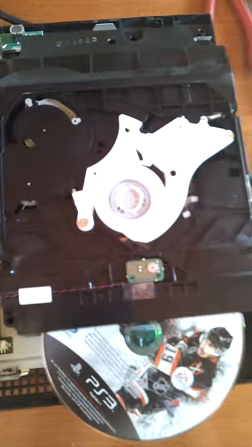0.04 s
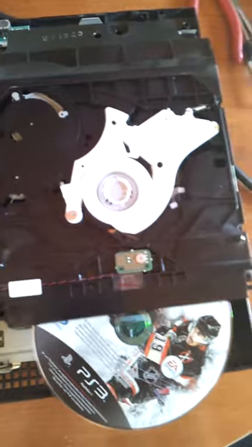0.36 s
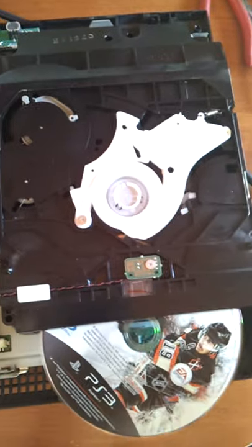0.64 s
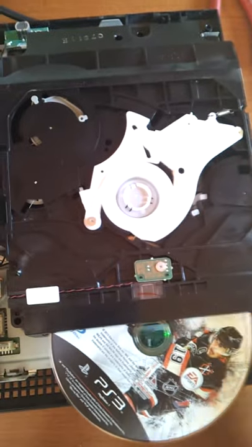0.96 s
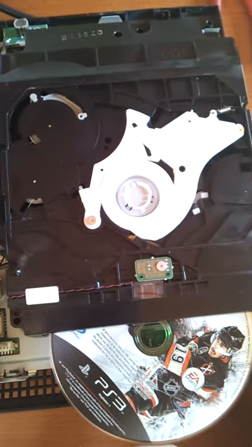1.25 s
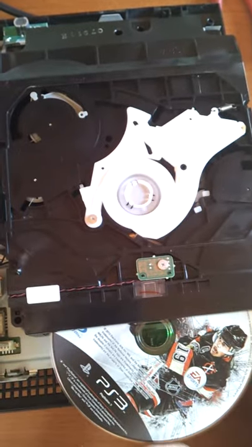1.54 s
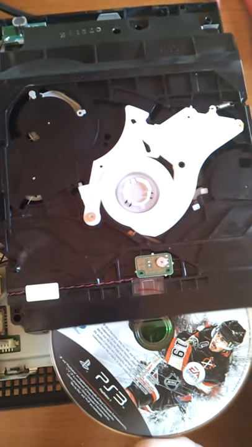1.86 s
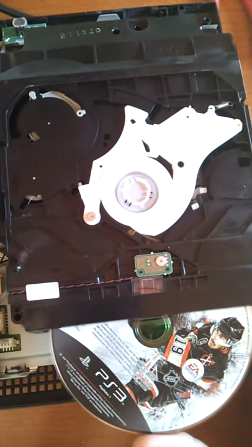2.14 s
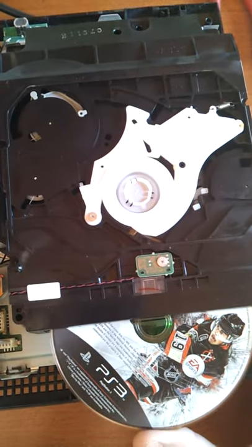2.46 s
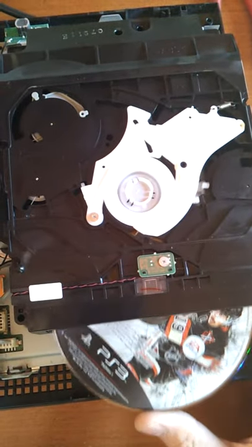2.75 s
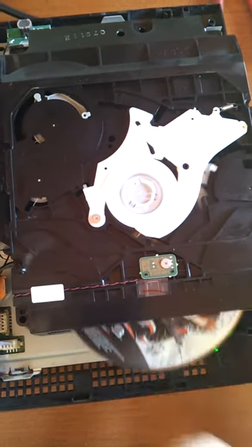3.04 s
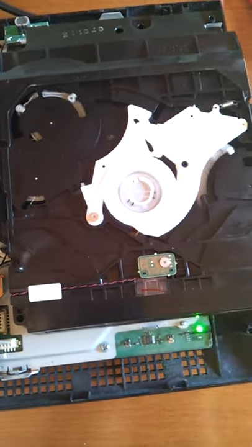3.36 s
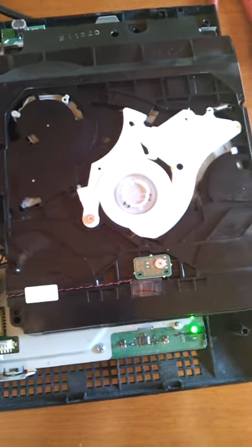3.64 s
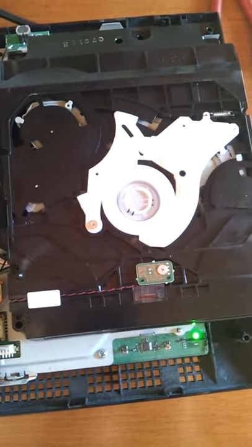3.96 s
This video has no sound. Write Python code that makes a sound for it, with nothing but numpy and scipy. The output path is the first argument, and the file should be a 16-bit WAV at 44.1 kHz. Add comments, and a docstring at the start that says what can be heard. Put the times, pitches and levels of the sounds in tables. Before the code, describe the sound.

A disc drive loads a disc, close up in a small room. A few light knocks come at 0.1 seconds, then faint hiss and a fading low hum, with soft bumps around 2.5. At 2.65 the rollers grab the disc with a loud, brief plastic rattle and tiny squeaks. The motor and gears whir until the end at 4 seconds, with sharp lever clicks and a latch snapping near 3.65.

```python
"""The loading motor of an open slot-loading disc drive pulls in a disc, close up on a table.
First come a few knocks, a low hum running down in room hiss and soft bumps as a hand nudges the disc.
At 2.65 s the rollers grab it with a harsh plastic rattle and tiny squeaks. The gears then whir and
tick with each turn of the shaft, while levers knock, the chassis rings and a spring latch snaps over."""
import sys
import numpy as np
from scipy import signal
from scipy.fft import rfft, irfft
from scipy.io import wavfile

SR = 44100
rng = np.random.default_rng(int(sys.argv[2]) if len(sys.argv) > 2 else 0)


def wav_record(signal):
    """Record a signal, one row per channel, as 16-bit PCM in the file named by sys.argv[1]."""
    frames = np.transpose(np.atleast_2d(signal))
    bounded = np.clip(frames, -1, 1)
    # unit amplitude maps onto the largest positive 16-bit level
    quanta = np.round(bounded * 32767).astype(np.int16)
    wavfile.write(sys.argv[1], SR, quanta)


N = 176400
T = np.arange(N) / SR
HZ = np.fft.rfftfreq(N, 1 / SR)
BURST_HZ = np.fft.rfftfreq(4096, 1 / SR)

# stereo image of the drive, narrowest in the mids: f/Hz, left-right correlation
DRIVE_LIKENESS = [(180, 0.35), (550, 0.81), (1100, 0.73), (2000, 0.05), (4970, 0.02)]


def motor(wobble=.005, flutter=.26, pulsing=.28):
    """Motor and gears whir: shaft harmonics, a buzz that repeats each turn, pulsing grit, ringing teeth."""
    # shaft speed: t/s, f/Hz
    shaft_speed = [(2.7, 81.6), (2.82, 86), (2.96, 82), (3.07, 92), (3.2, 86.8), (3.5, 90), (3.62, 87),
                   (3.74, 90), (3.88, 85), (4, 85.4)]
    # gear train envelope: t/s, body level/dB, treble level/dB
    whir = [(2.64, -86, -90), (2.67, -42.5, -31.5), (2.83, -44.5, -42), (3.08, -45.5, -42),
            (3.36, -45, -41.5), (3.52, -43.5, -40.5), (3.6, -39.5, -38), (3.71, -42.5, -40),
            (3.85, -40, -39.5), (4, -40, -38)]
    # shaft harmonics: multiple of the shaft speed, level/dB
    orders = [(5, -2.5), (6, 1), (7, -2.5), (8, 3), (9, -1), (10, .5), (24, -2), (26, -13), (30, -1)]
    # gear noise spectrum: f/Hz, level/dB
    gear_colour = [(88, -22), (150, -19), (361, -17.5), (480, -6), (566, -8.5), (854, 2), (1060, -7),
                   (1290, -2), (1600, -5), (2200, -2.5), (3920, -11), (4860, -8.5), (5500, -9),
                   (6400, -8.5), (8900, -22), (14500, -19.5), (16000, -34)]
    # gear panning: f/Hz, left over right/dB
    gear_balance = [(110, 9), (380, 7), (700, -11.5), (1290, 6), (2380, 2), (4400, 1.5), (8120, 7),
                    (15000, 5)]
    # the gears brighten as the disc goes in: t/s, top octave level/dB
    sheen = [(3.3, -3.5), (3.87, 1.5)]
    speed = curve(shaft_speed) * (1 + wobble * drift(19.66))
    turns = np.cumsum(speed) / SR
    angle = 2 * np.pi * turns
    sides = pan(read(gear_balance, HZ))
    colour = amp(read(gear_colour, HZ)) * sides
    tones = sum(amp(db) * (1 + flutter * drift(4.9)) * np.cos(k * angle + 2 * np.pi * rng.random())
                for k, db in orders)
    tones = unit(irfft(rfft(tones) * sides, N))
    one_turn = irfft(np.exp(2j * np.pi * rng.random((2, 130))), 4096)
    looped = np.array([np.interp(turns % 1, np.linspace(0, 1, len(w)), w) for w in one_turn])
    buzz = pair(looped, colour)
    pulsed_noise = rng.standard_normal((2, N)) * (1 + pulsing * np.cos(angle))
    grit = pair(pulsed_noise * amp(2.6 * drift(220)), colour)
    body, fizz = halves(grit + amp(-2) * buzz)
    fizz = brighten(scatter(fizz, decay_s=.013, direct=1.52), curve(sheen))
    low = amp(-6) * tones + amp(.65) * body
    high = amp(2) * fizz + gear_teeth(turns, speed)
    return amp(curve(whir)) * low + amp(curve(whir, axis=2)) * high


def gear_teeth(turns, speed, width_hz=175, spread_db=3.5, decay_s=.0017, pan_db=8):
    """A bright tooth tick once a turn, over steady friction, excites a gliding resonance."""
    # ring of the teeth: t/s, f/Hz, level against the gear treble/dB
    tooth_ring = [(2.7, 5760, -15), (3.12, 6460, -6), (3.2, 6360, -2), (3.52, 6100, -2.5), (4, 6240, -3.5)]
    force = amp(spread_db * rng.standard_normal(N).clip(-2, 2))[turns.astype(int)]
    since_tick = (turns % 1) / speed
    strikes = force * (.27 + np.exp(-since_tick / decay_s))
    contact = pair(rng.standard_normal((2, N)) * strikes, 1)
    # shift down, low-pass, shift back: a band-pass that follows the pitch
    carrier = np.exp(2j * np.pi * np.cumsum(curve(tooth_ring)) / SR)
    pole = np.exp(-2 * np.pi * width_hz / SR)
    ring = carrier * signal.lfilter([1], np.poly([pole, pole]), contact / carrier)
    return amp(curve(tooth_ring, axis=2)) * pan(pan_db) * unit(ring.real)


def rattle(hits_per_s=6000, spread_db=2, scrape=.34, judder_db=2.5):
    """Dense small collisions ring the chassis as the rollers grab the disc; harder ones are brighter."""
    # start-up envelope: t/s, body level/dB, treble level/dB
    envelope = [(2.648, -71, -68), (2.653, -40, -31), (2.664, -38.5, -32), (2.674, -31.5, -30.5),
                (2.695, -33.5, -27), (2.702, -25.5, -17), (2.714, -25.5, -24.5), (2.722, -26, -24),
                (2.73, -26, -19.5), (2.743, -29, -19), (2.756, -27.5, -21), (2.77, -37.5, -33),
                (2.83, -72, -74)]
    # rattling plastic spectrum: f/Hz, level/dB
    colour = [(100, -47), (321, -20), (484, -8.5), (759, -15.5), (923, 1.5), (1020, -10), (1240, -4),
              (1660, -3.5), (2180, -11.5), (2550, -9.5), (4160, -11), (5570, -6), (10600, -20.5),
              (16000, -30.5)]
    # rattle panning: f/Hz, left over right/dB
    balance = [(290, 23), (640, -15), (1410, 5), (3100, -2), (6820, 1), (15000, -6)]
    hits = (rng.random(N) < hits_per_s / SR) * amp(spread_db * rng.standard_normal(N).clip(-2, 2))
    contact = hits * rng.choice([-1, 1], (2, N)) + scrape * rng.standard_normal((2, N))
    contact *= amp(judder_db * drift(220))
    shaken = pair(contact, amp(read(colour, HZ)) * pan(read(balance, HZ)))
    body, treble = halves(chassis(shaken, ring_db=-46))
    treble = scatter(treble, decay_s=.007, direct=1.17)
    force_db = curve(envelope, axis=2)
    treble = brighten(treble, .59 * (force_db + 25.5))
    return amp(curve(envelope)) * body + amp(force_db) * treble


def levers(thud_hz=331):
    """Levers and rollers knock, each with a thud, a hollow body and a tick."""
    # knocks: t/s, left over right/dB, thud level/dB, body level/dB, body f/Hz,
    # tick level/dB, tick f/Hz, decay/s
    knocks = [(.107, 17, -43.5, -49.5, 1550, -43.5, 5040, 0.017),
              (0.115, 25, -34.5, -39, 496, -39, 2980, 0.0054),
              (0.129, 24, -31.5, -41, 1400, -32.5, 4540, 0.0015),
              (1.048, 2, -67, -60, 1000, -50, 2300, 0.01), (1.26, 2, -55, -52.5, 805, -51.5, 3000, 0.01),
              (1.701, 4, -72, -50, 1200, -45, 5150, 0.0033), (2.651, 5, -60, -37, 980, -32, 4760, 0.0029),
              (2.67, -1, -48, -23, 1400, -17, 2750, 0.0029),
              (2.7186, 10, -54, -17, 1300, -30, 4580, 0.0017),
              (2.7295, -4, -44, -16, 1010, -17, 7050, .0035),
              (2.7401, 4, -48, -14, 1200, -13.5, 7000, 0.0029),
              (2.748, 1, -43, -17.5, 1130, -28, 5500, .003),
              (2.8651, 1.5, -59, -25, 1330, -19, 4600, 0.0071),
              (3.1459, -3, -55, -29.5, 1070, -46, 5000, 0.0064),
              (3.167, 0, -44, -27.5, 1130, -21, 5800, 0.0028),
              (3.403, 24, -32.5, -37, 700, -33, 4000, 0.0038),
              (3.437, 1.5, -59, -25, 1072, -44, 4996, 0.0036),
              (3.5461, 13, -30, -22.5, 890, -36, 3500, 0.0024),
              (3.579, 0, -53, -30.5, 990, -38, 7007, .008), (3.592, 7, -44, -33, 1080, -29.5, 5750, 0.0099),
              (3.6086, 10, -42, -19.5, 1490, -36, 6000, 0.0024),
              (3.646, 5, -50, -35, 1500, -27, 4400, 0.0088),
              (3.655, 12, -32, -23, 1190, -14, 10500, 0.0022),
              (3.7783, 5, -50, -28.5, 900, -20.5, 6670, 0.0035),
              (3.789, 2, -36.5, -27, 899.5, -31.5, 7770, 0.0043),
              (3.8099, 20, -32, -37, 1540, -7, 5500, 0.00038), (3.912, 0, -39, -37, 750, -36, 5930, 0.0065),
              (3.9284, 4.5, -33.5, -30.5, 851, -27, 7800, 0.0094),
              (3.9858, 2, -31, -20.5, 679.6, -21, 2580, 0.0062),
              (3.988, 4.5, -41, -14.5, 1529, -15, 6840, 0.0043)]
    mix = np.zeros((2, N))
    for s, pan_db, thud_db, body_db, body_hz, tick_db, tick_hz, decay_s in knocks:
        layers = [(thud_db, band(thud_hz, octaves=.6)),
                  (body_db, band(body_hz, octaves=.38)),
                  (tick_db, band(tick_hz, octaves=.64))]
        add(mix, s, pan(pan_db) * sum(amp(db) * burst(colour, decay_s) for db, colour in layers))
    return mix


def disc_slips():
    """The disc slips on the rollers in tiny squeaky scrapes."""
    # slips: t/s, level/dB, hold/s
    slips = [(2.656, -31.5, 0.0065), (2.662, -25.5, 0.0024), (2.6698, -14.5, .001), (2.681, -24, 0.0037),
             (2.686, -32, .008)]
    mix = np.zeros((2, N))
    for s, db, hold_s in slips:
        add(mix, s, amp(db) * burst(band(5700, octaves=.09), decay_s=.0018, hold_s=hold_s))
    return mix


def latch(at_s=3.6552, pan_db=5.5, level_db=-4.2):
    """The spring latch snaps over, bright and short."""
    # snap spectrum: f/Hz, level/dB
    colour = [(100, -38), (2200, -19.5), (3000, -6), (3500, -17.5), (4400, -11.5), (4790, -4), (6200, 0.5),
              (6900, -6), (9000, -19), (11600, -14), (16000, -32)]
    snap = burst(amp(read(colour, BURST_HZ)), decay_s=.0018, hold_s=.002)
    mix = np.zeros((2, N))
    add(mix, at_s, pan(pan_db) * amp(level_db) * snap)
    return mix


def chassis(x, ring_db):
    """The casing rings on after whatever shakes it."""
    # casing modes: f/Hz, level/dB, t60/s
    modes = [(927, -5, 0.1), (1110, -3, 0.082), (1265, -8, 0.14), (1384, -7, 0.099), (1590, -7, 0.11),
             (2603, 10, 0.044), (3430, 4, 0.057), (4840, 5, 0.07)]
    t = T[:SR // 4]
    ring = sum(amp(db - 60 * t / t60) * np.cos(2 * np.pi * hz * t + rng.uniform(-.91, 1, (2, 1)))
               for hz, db, t60 in modes)
    return x + amp(ring_db) * signal.oaconvolve(x, ring, axes=1)[:, :N]


def scatter(x, decay_s, direct):
    """Crowded reflections inside the plastic casing smear the treble and ripple its spectrum."""
    t = T[:SR // 10]
    echoes = rng.standard_normal((2, len(t))) * np.exp(-t / decay_s)
    echoes /= np.linalg.norm(echoes, axis=1, keepdims=True)
    return unit(direct * x + signal.oaconvolve(x, echoes, axes=1)[:, :N])


def low_bumps(pan_db=14):
    """Soft low handling bumps, and a deep microphone-overload thump after the latch snaps."""
    # bumps and the closing thump: t/s, f/Hz, width/s, level/dB
    bumps = [(2.512, 62, 0.01, -32), (2.543, 109, 0.0072, -25.5), (2.55, 34.3, 0.14, -43),
             (2.585, 52, 0.011, -35), (3.7, 22, 0.059, -46)]
    return pan(pan_db) * sum(amp(db) * np.exp(-((T - s) / width) ** 2) * np.cos(2 * np.pi * hz * (T - s))
                             for s, hz, width, db in bumps)


def hum(pan_db=12):
    """A low, unsteady hum sinks and fades as it runs down."""
    # run-down: t/s, f/Hz, level/dB
    run_down = [(.13, 44.8, -54), (.75, 43.04, -54.5), (1.5, 38.2, -63), (3, 30.6, -64)]
    level = np.sqrt(2) * amp(curve(run_down, axis=2)) * (1 + .3 * drift(7.1))
    return pan(pan_db) * level * np.sin(2 * np.pi * np.cumsum(curve(run_down)) / SR)


def idle(waver_rad=.7):
    """The idling machine sings faintly, with a slight waver."""
    # idle tones: f/Hz, level/dB
    tones = [(540, -67.5), (952, -68.5), (992, -70), (1036, -76), (1078, -74), (1355, -76), (1396, -81.5),
             (1755, -76)]
    return sum(amp(db) * np.cos(2 * np.pi * hz * T + waver_rad * drift(7.2) + rng.uniform(-.88, 1, (2, 1)))
               for hz, db in tones)


def hiss(level_db=-52.5):
    """A steady bed of room and microphone noise, its rumble leaning left."""
    # noise floor spectrum: f/Hz, level/dB
    spectrum = [(15, -30), (30, -17), (70, -10.5), (300, -14), (540, -15.5), (700, -16.5), (1300, -19.5),
                (2600, -23.5), (15500, -28)]
    # hiss panning: f/Hz, left over right/dB
    balance = [(80, 5.5), (250, 3), (600, 0), (1500, 0)]
    # wide stereo image: f/Hz, left-right correlation
    likeness = [(60, 0.21), (240, 0.19), (950, 0.18), (3770, 0.01)]
    colour = amp(read(spectrum, HZ)) * pan(read(balance, HZ))
    return amp(level_db + .51 * drift(9.9)) * pair(rng.standard_normal((2, N)), colour, likeness)


def room(x, t60=.22, wet_db=-17):
    """Sparse reflections of a small, fairly dry room."""
    t = T[:SR // 3]
    taps = rng.standard_normal((2, len(t))) * (rng.random((2, len(t))) < .05)
    taps *= (t > .004) * amp(-60 * t / t60)
    return x + amp(wet_db) * signal.oaconvolve(x, taps / np.linalg.norm(taps[0]), axes=1)[:, :N]


def burst(colour, decay_s, hold_s=0, attack_s=.00042, tail_db=-28.5):
    """Crowded plastic modes as shaped noise: quick attack, short hold, fast decay and a faint tail."""
    t = T[:2 * (len(colour) - 1)]
    late = np.maximum(t - hold_s, 0)
    tail = amp(tail_db) * np.exp(-late / min(.04, 8 * decay_s))
    shape = np.minimum(t / attack_s, 1) * (np.exp(-late / decay_s) + tail)
    sound = pair(rng.standard_normal((2, len(t))), colour) * shape
    return sound * np.linalg.norm(shape) / np.linalg.norm(sound, axis=1, keepdims=True)


def band(centre_hz, octaves):
    """A bell-shaped spectrum for a burst."""
    return 1 / (1 + (np.log2((BURST_HZ + 1) / centre_hz) / octaves) ** 2 / 2) ** 2


def brighten(x, db, shelf_hz=8200):
    """A high shelf that rides a level curve."""
    sheen = irfft(rfft(x) * (1 - 1 / (1 + (HZ / shelf_hz) ** 10)), N)
    return x + sheen * (amp(db) - 1)


def halves(x, split_hz=2400):
    """Body and treble of a sound, each at rms 1."""
    low = irfft(rfft(x) / (1 + (HZ / split_hz) ** 4), N)
    return unit(low), unit(x - low)


def pair(two, colour, likeness=DRIVE_LIKENESS):
    """Colours two unrelated signals into a partly correlated stereo pair of rms 1."""
    hz = np.fft.rfftfreq(two.shape[1], 1 / SR)
    left, other = rfft(two)
    alike = np.clip(read(likeness, hz), -.98, .98)
    right = alike * left + np.sqrt(1 - alike ** 2) * other
    return unit(irfft(np.array([left, right]) * colour, two.shape[1]))


def drift(rate_hz):
    """Slow random wander of rms 1."""
    return unit(irfft(rfft(rng.standard_normal(N)) / (1 + (HZ / rate_hz) ** 4), N))


def curve(rows, axis=1):
    """One column of a timed table, at every sample."""
    rows = np.array(rows)
    return np.interp(T, rows[:, 0], rows[:, axis])


def read(points, hz):
    """A spectrum table on a log-frequency axis."""
    f, value = np.transpose(points)
    return np.interp(np.log(hz + 1), np.log(f + 1), value)


def pan(db):
    """Constant-power gains; positive leans left."""
    gains = amp(np.array([[.5], [-.5]]) * db)
    return gains / np.sqrt((gains ** 2).mean(0))


def add(mix, s, sound):
    """Mixes a sound in at a time."""
    part = mix[:, round(s * SR):][:, :sound.shape[1]]
    part += sound[:, :part.shape[1]]


def amp(db):
    """Decibels to gain."""
    return 10 ** (np.asarray(db) / 20)


def unit(x):
    """Scales to rms 1."""
    return x / np.sqrt(np.mean(abs(x) ** 2) + 1e-20)


def scene():
    """The mechanism in its room, over bumps, hum, idle tones and hiss."""
    mechanism = motor() + rattle() + chassis(levers() + disc_slips() + latch(), ring_db=-49)
    return room(mechanism) + low_bumps() + hum() + idle() + hiss()


def record(dry, start_s=.105, cutoff_hz=16100):
    """The sound cuts in, clips at full scale and is low-passed."""
    clipped = np.clip(dry * (T > start_s), -1, 1)
    lowpass = signal.firwin(511, cutoff_hz, window=("kaiser", 9), fs=SR)
    return signal.oaconvolve(clipped, lowpass[None], "same")


dry = scene()
out = record(dry)
wav_record(out)
```